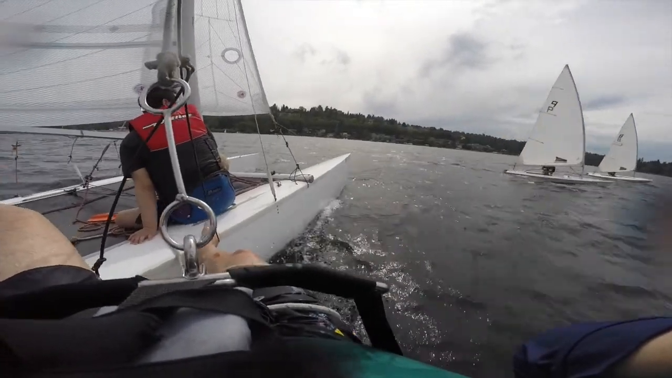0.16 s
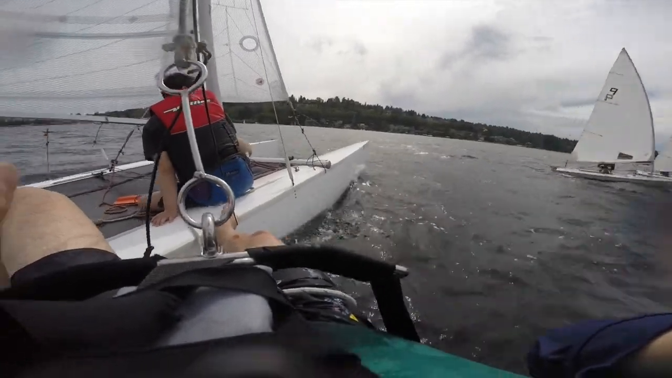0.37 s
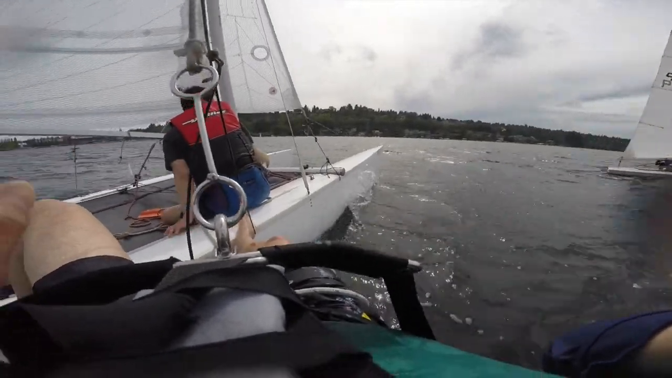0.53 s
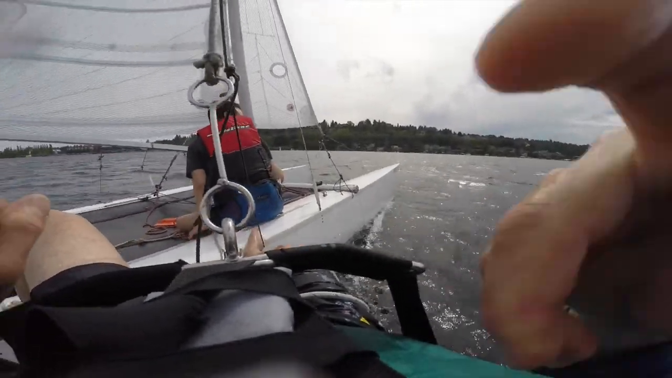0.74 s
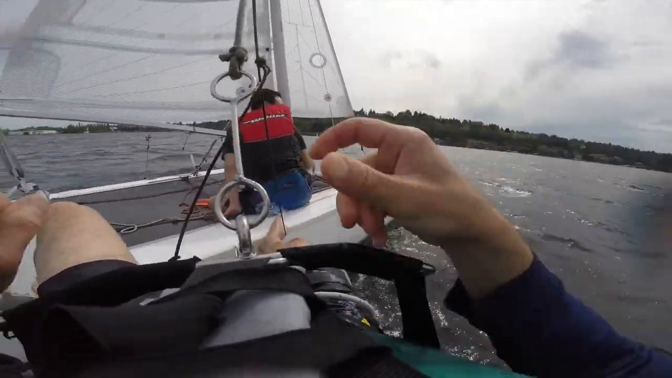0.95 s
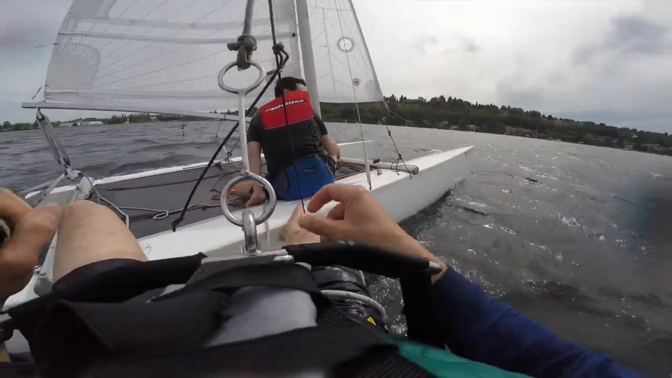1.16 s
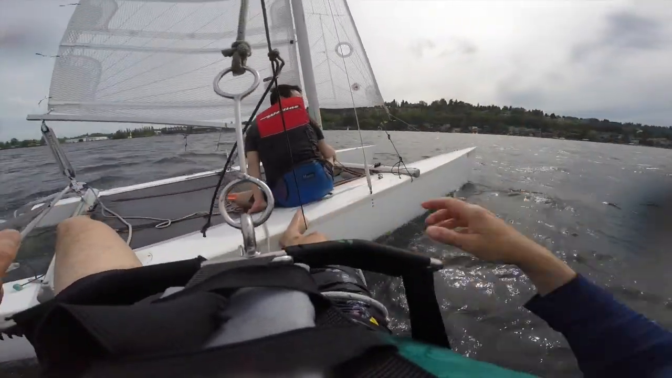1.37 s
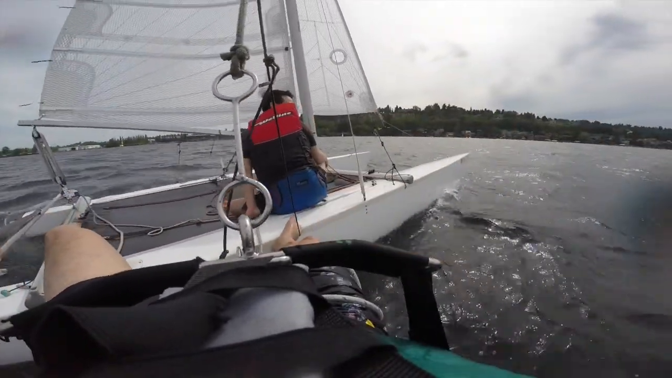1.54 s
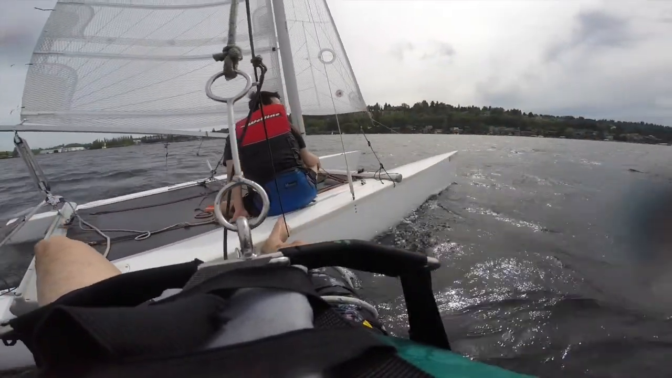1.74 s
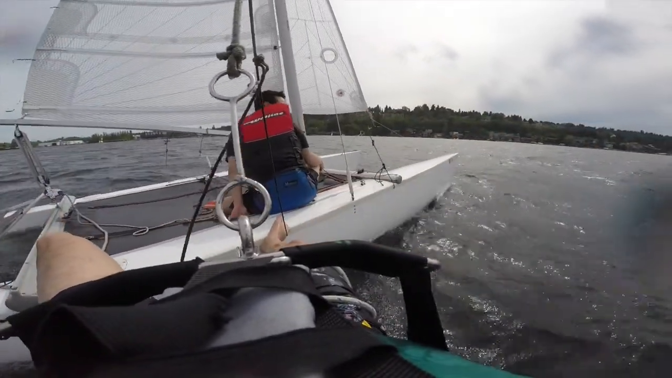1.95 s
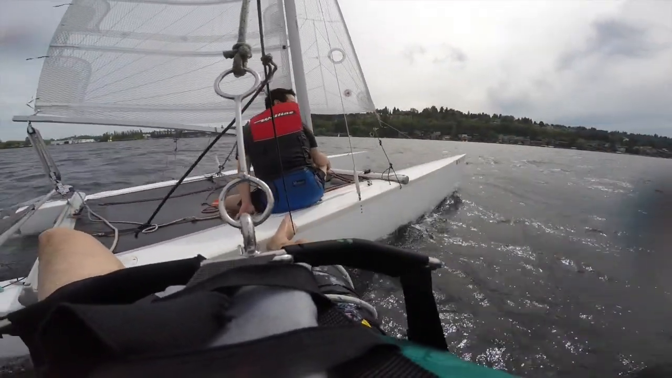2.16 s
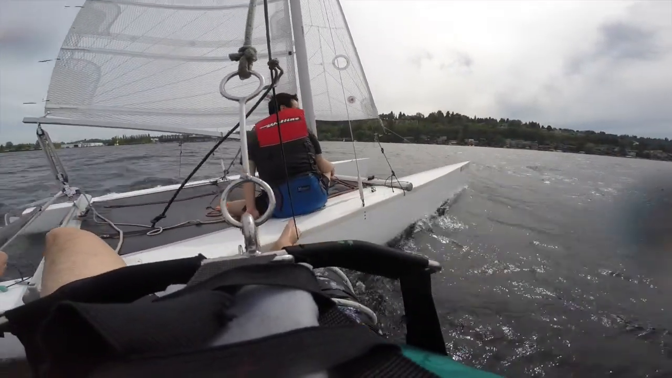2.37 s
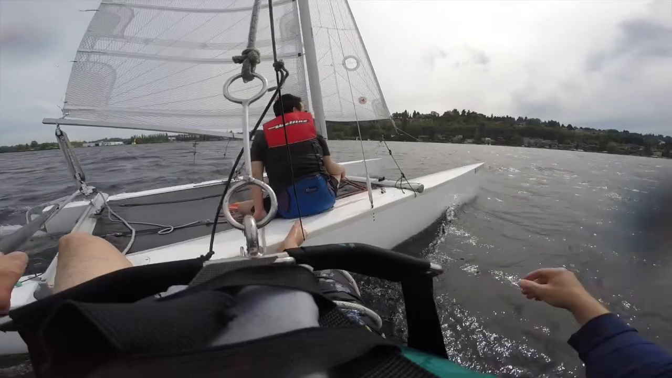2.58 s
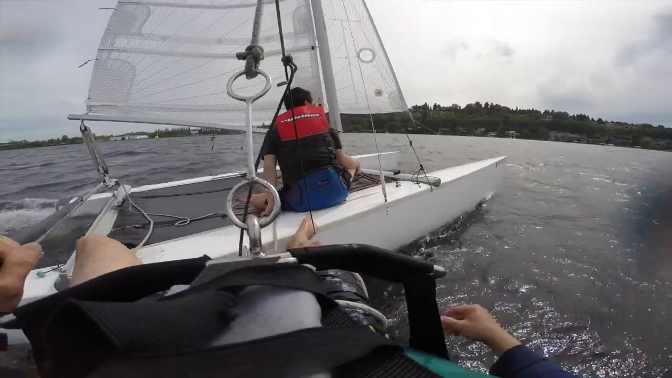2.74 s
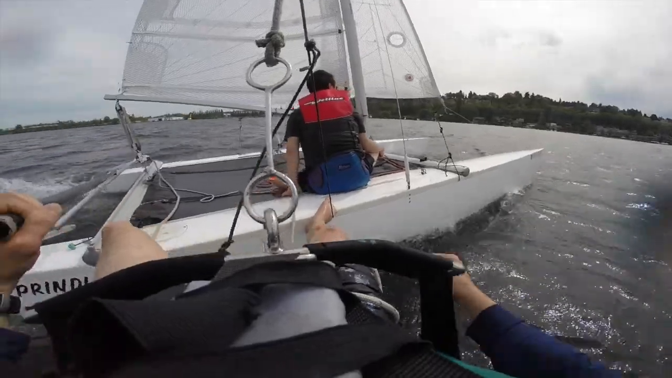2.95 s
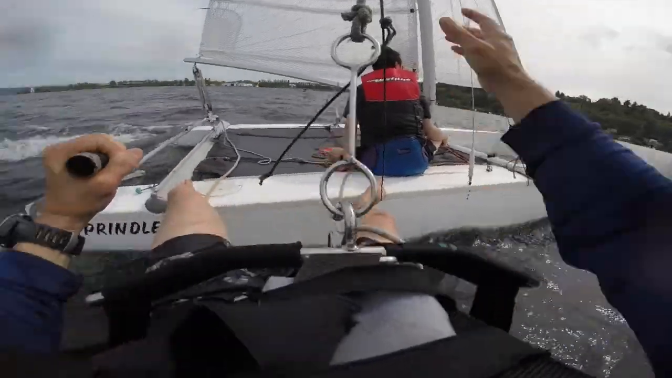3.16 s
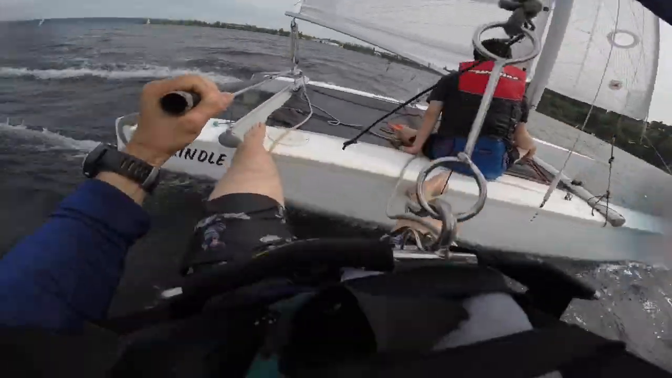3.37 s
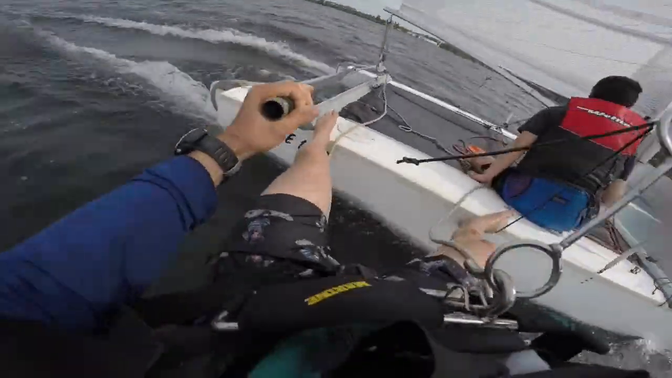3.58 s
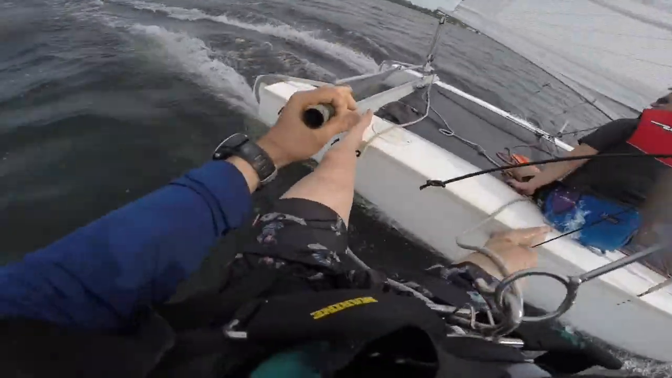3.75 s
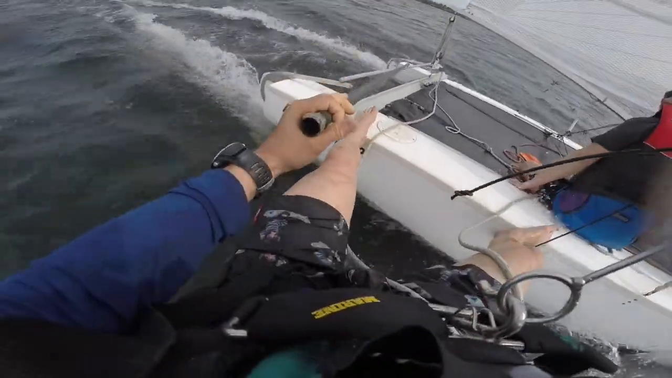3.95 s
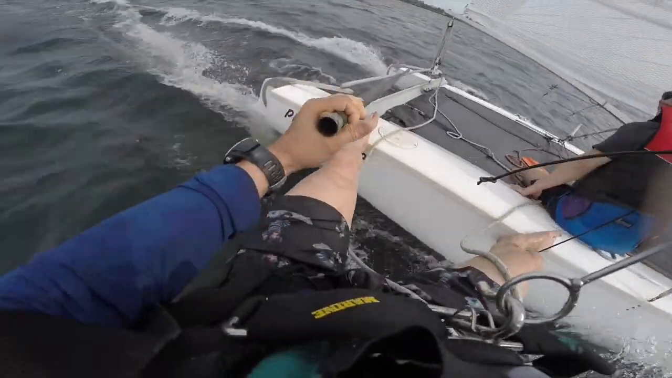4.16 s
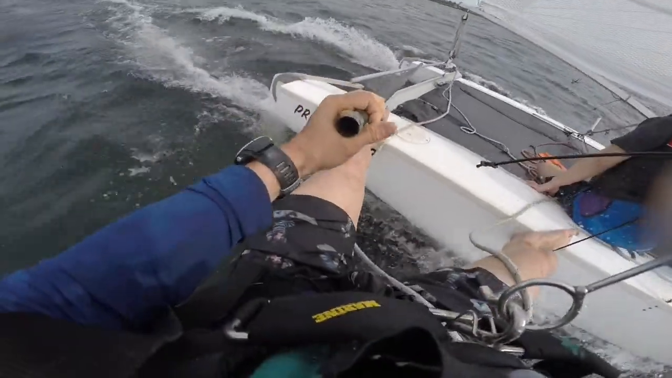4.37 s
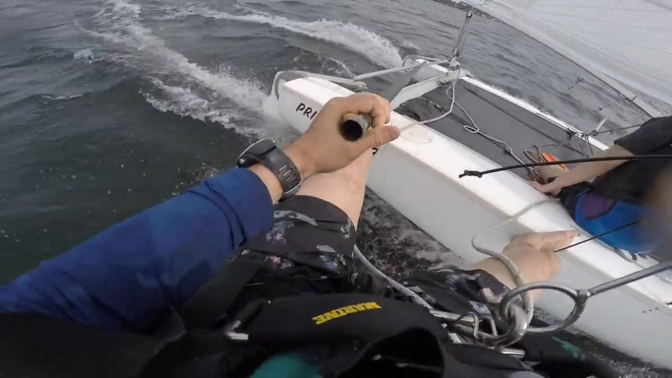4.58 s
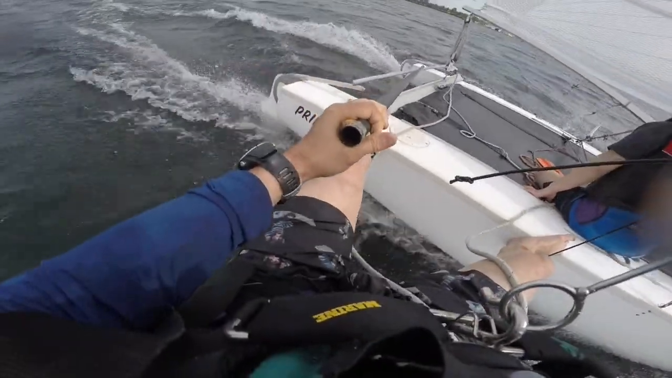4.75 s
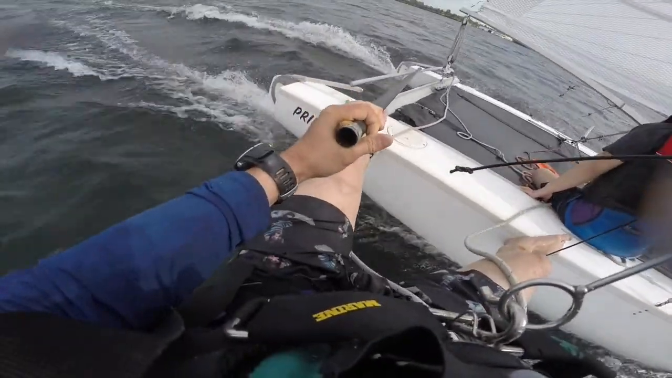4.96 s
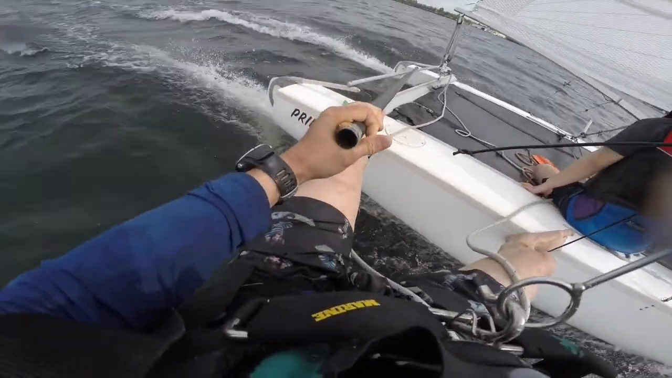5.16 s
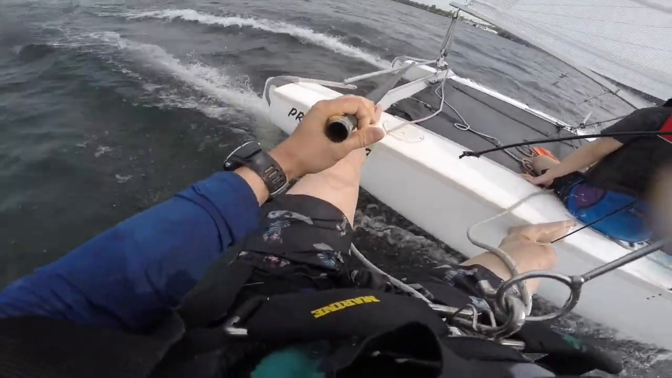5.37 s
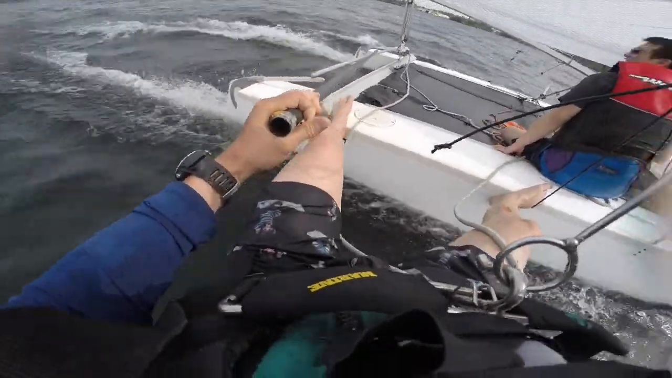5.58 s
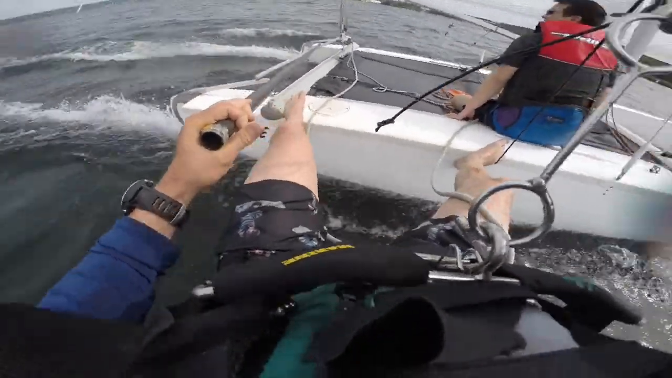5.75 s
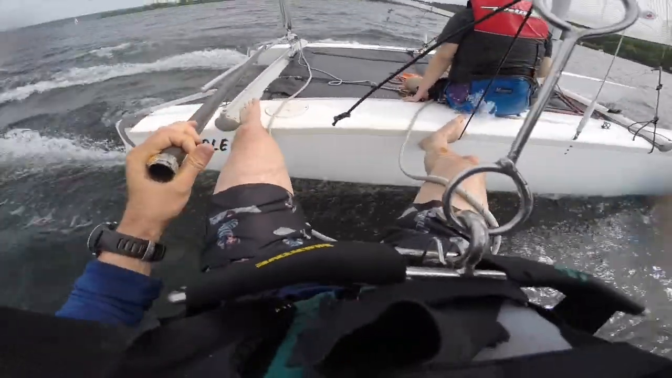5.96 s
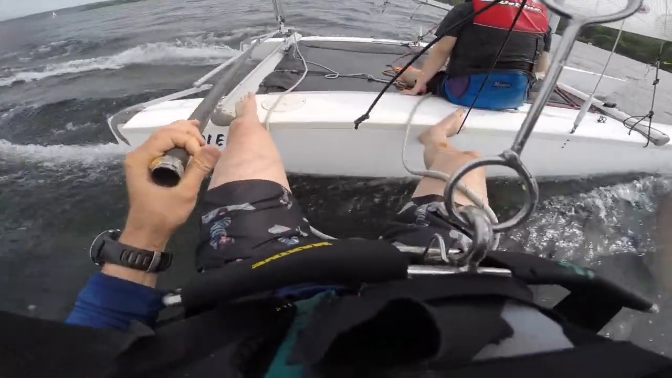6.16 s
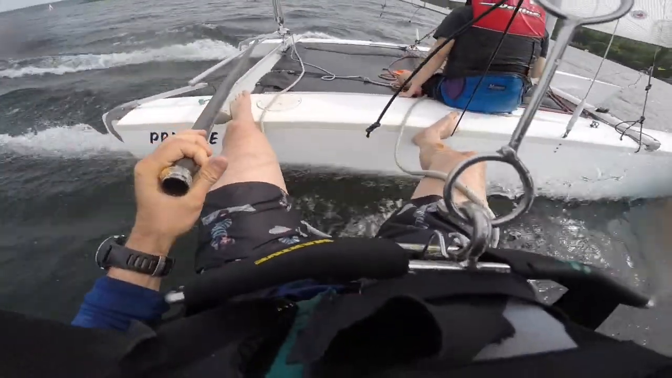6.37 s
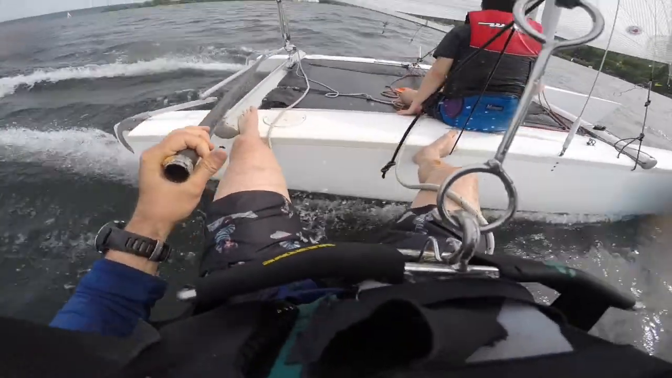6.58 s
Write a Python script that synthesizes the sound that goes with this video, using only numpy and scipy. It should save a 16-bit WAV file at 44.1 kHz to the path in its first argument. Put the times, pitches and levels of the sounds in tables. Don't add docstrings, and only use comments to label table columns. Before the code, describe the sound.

On open water beside a fast catamaran, wash hisses and fizzes continuously a few metres away. Heard through a sealed plastic case, it sounds muffled and resonant. A very loud crack and a flurry of clicks and scrapes hit the case early. Midway, wind thumps and rips across it as the head turns, and the wash changes colour. Later come a few light taps and a sharp flick.

```python
import sys
import numpy as np
from scipy import signal
from scipy.fft import rfft, irfft
from scipy.io import wavfile
from scipy.ndimage import uniform_filter1d

SR = 44100
rng = np.random.default_rng(int(sys.argv[2]) if len(sys.argv) > 2 else 0)


def unload_wav(signal):
    wavfile.write(
        sys.argv[1],
        SR,
        np.round(np.clip(np.atleast_2d(signal).T, -1, 1) * 32767).astype(np.int16),
    )


def to_linear_factor(level_db):
    exponent = np.asarray(level_db, float) / 20
    return 10 ** exponent


N = 291930

# (time [s], level [dB])
WASH_FLOW = [(0.0, -39.5), (0.26, -41.5), (0.48, -47.5), (0.68, -45.5), (0.92, -41), (1.75, -44),
             (2.91, -42), (3.43, -36.5), (4.13, -44), (4.35, -40.5), (4.55, -41), (5.49, -42),
             (6.01, -40.5), (6.38, -44.5), (6.62, -40.5)]
# (time [s], turn [0 bow - 1 wake])
HEAD_TURN = [
    (0, 0.22),
    (2.9, 0.36),
    (3.4, 0.3),
    (3.8, 0.91),
    (5.9, 0.87),
    (6.62, 0.47),
]
# (frequency [Hz], level [dB per Hz])
BOW_COLOUR = [(290, -36), (500, -13.5), (718, -13), (1320, -5), (1640, -3), (2160, -7.5), (2390, -6.5),
              (3250, -17.5), (3540, -15.5), (3920, -22.5), (5550, -15.5), (8090, -34.5), (10400, -34),
              (14500, -39), (16000, -69)]
# (frequency [Hz], level [dB per Hz])
WAKE_COLOUR = [(290, -49), (500, -10.5), (570, -12), (621, -11.5), (1020, -13), (1360, -3), (1770, -9),
               (1950, -8.5), (2650, -8), (3060, -16), (5800, -17), (8210, -39), (12500, -39), (14900, -48),
               (16000, -86)]
# (frequency [Hz], width [Hz], lift [dB])
BOW_MODES = [(1630, 390, 2), (2360, 190, 9.5), (2900, 640, -4), (4100, 150, 4), (4940, 160, -8),
             (5400, 950, -1.5), (9600, 640, 2), (10450, 800, 6.5), (11300, 470, -8)]
# (frequency [Hz], width [Hz], lift [dB])
WAKE_MODES = [(1400, 100, 0), (1755, 175, 5.5), (2120, 74, -2), (2315, 27, 8.5), (2567, 72, -7),
              (2645, 350, 12), (2955, 190, -8), (3620, 300, -13), (5050, 220, -3.5), (8750, 400, 1),
              (12200, 340, -2), (12600, 880, 3)]
# (level facing bow [dB], lift facing wake [dB], slope [dB per dB of wash])
WASH_LAYERS = [(-44.5, -0.83, 0.9), (-56.5, 5, 0.55), (-70, 8, 0.04)]
# (start [s], lift [dB], rise [ms])
SHOWERS = [
    (.05, 3.5, 140),
    (1.85, 2.5, 150),
    (2.85, 3, 72),
    (3.8, 0, 67),
    (4.4, 4, 220),
    (6.5, 6, 120),
]
SHOWER_SHARES = [0.074, 0.96, 1.05]
# (time [s], peak [dB], rise [ms], tilt [dB per octave], ring [Hz])
TAPS = [(.4799, -14, 0.24, -5, 1200), (.6108, -18, 0.82, -14, 1400), (.6802, -18, 0.28, -14, 2000),
        (.7045, -15.5, 3.4, 3, 1950), (.7462, -30.5, 0.29, 9, 1690), (.893, -20.5, 3.7, 10, 2900),
        (.898, -14.5, 6, 7, 1650), (.904, -15.5, 3, 5, 2700), (1.797, -30, 19, -9, 2600),
        (2.11, -29.5, 38, -15, 1700), (3.28, -21.5, 14, -1.5, 1350), (3.564, -24, 3, -5, 2500),
        (3.581, -24, 16, -15, 3170), (3.7478, -19.5, 1.05, 6, 8300), (3.806, -30, .4, 7.5, 2650),
        (3.913, -24, 1.24, -5, 1490), (4.4255, -17.5, 1.4, -17, 2530), (5.785, -14.5, 0.38, 0.5, 2450),
        (5.8071, -20, 0.27, -7, 2480), (3.288, -24, 0.64, 3, 5500), (3.3005, -29, .5, 8, 1200)]
# (frequency [Hz], level [dB])
CASE_COLOUR = [(300, -24), (800, -5), (1300, 8), (1700, 4.5), (2500, 8.5), (3500, -1.5), (4500, -8),
               (6000, -13.5), (8000, -24), (10500, -30), (13000, -31), (15000, -48), (16500, -71)]
# (frequency [Hz], level [dB], ring time to -60 dB [ms])
LENS = [(875, -1, -1.5), (1660, -6, 14), (1940, -6.5, 9), (2200, -1, 10), (3300, -4, 3.5),
        (4340, -19.5, 10)]
DOOR = [(1480, -12, 18), (1710, -1.5, 15), (2360, 2.5, 9.7), (3390, -7, 11), (4270, -22, 6)]
LATCH = [(1605, -1.5, 18), (2580, 1.5, 11), (3650, -3, 9.4), (5150, -6.5, 11), (7200, -12, 7)]
CLASP = [(1720, -1, 15), (2000, -8, 9), (2700, -7, 31), (4100, -3, 9.9), (5760, -9, 9.9)]
DROP = [(3930, -1.5, 10), (4470, -11, 10)]
SHELL = [(990, 2, 14), (1350, 0, 16)]
BUCKLE = [(2540, 0.5, 23), (3260, -8, 22)]
STRAP = [(770, -12.5, 23), (1330, -10, 11), (2140, -20, 29), (2345, -9.5, 17), (2564, 2, 18.5),
         (3330, -20, 8.4), (4360, -15.5, 12)]
# (part's modes, contact [ms], list of (time [s], strength [dB], pitch [re its modes]))
STRIKES = [
    (LENS, .45, [(.48, -7.5, 0.98)]),
    (DOOR, 0.66, [(.611, -10.5, 1.013)]),
    (CLASP, 0.22, [(.6803, -13.5, 1.01), (.7464, -28, 1.02)]),
    (LATCH, .28, [(.7088, -11, 1.033)]),
    (BUCKLE, 0.45, [(3.748, -25.5, 1.04), (3.8068, -37, 1.23), (3.914, -34, 1.02), (4.426, -22, 0.94)]),
    (STRAP, 0.26, [(5.7853, -10.5, 0.95), (5.7888, -20, 0.89), (5.8072, -23, 0.92)]),
    (DROP, 0.77, [(.805, -36, 1.1), (2.061, -32.5, 1.38), (4.5935, -32, .99)]),
    (SHELL, 1.7, [(3.298, -23, 1.25)]),
]
# (time [s], peak [dB], swing [Hz], decay [ms], direction [+-1])
KNOCKS = [
    (0.4798, -3.5, 88, 1.35, 1),
    (0.61, -21.5, 287, 4, 1),
    (.68, -24.5, 200, 1.3, 1),
    (.708, -19, 111, 14.4, 1),
    (.748, -29.5, 624, 4.2, 1),
    (4.426, -23, 280, 4.3, -1),
    (4.635, -32.5, 330, 3.3, -1),
    (5.785, -26, 510, 3.6, 1),
    (5.806, -19.5, 110, 4.1, 1),
]
# (time [s], peak [dB], swing [Hz], decay [ms], direction [+-1])
SLAPS = [(0.89, -19.5, 65, 9.6, 1), (1.7, -25.5, 147, 21.8, 1), (1.79, -25.5, 172, 20, 1),
         (3.74, -29.5, 220, 11.6, 1), (2.4, -24, 133, 11.8, 1), (3.27, -22, 302, 16, 1),
         (3.291, -18, 302, 6.65, 1), (3.3, -7, 130, 4.5, 1), (3.346, -18.5, 100, 6.4, -1),
         (3.44, -22, 161, 15.6, 1), (3.489, -19, 138, 8, 1), (3.568, -14, 121, 8.7, 1),
         (3.586, -11.5, 105, 8.6, -1), (4.71, -39, 383, 6.7, 1), (5.527, -23.5, 143, 4.1, 1),
         (5.533, -22.5, 200, 5.6, 1), (5.932, -24, 112, 11, 1), (5.999, -33, 340, 6.8, 1),
         (6.218, -28, 256, 4, 1), (6.5, -24.5, 49.3, 14.4, 1)]
# (time [s], strength [dB])
GUSTS = [(0.0, -38.5), (0.24, -38.5), (0.59, -42), (0.96, -36.5), (1.27, -40), (1.53, -40.5), (1.86, -37),
         (2.12, -37), (3.08, -38), (3.3, -32.5), (3.45, -30), (4.09, -43.5), (4.48, -44), (4.85, -48),
         (5.49, -45), (5.79, -36), (6.32, -43), (6.62, -40)]
# (frequency [Hz], level [dB per Hz])
EDDY_COLOUR = [(11, -36), (18, -12), (32, 10), (66, 1), (118, 0), (172, -5), (206, -11), (259, -13),
               (301, -9), (372, -17.5), (424, -18.5), (649, -28.5), (900, -29), (1170, -47), (1980, -120)]
# (level in a mean gust [dB], slope [dB per dB of gust])
WIND_LAYERS = [(-42.5, 0.75), (-42.5, 1.18), (-48, 0.97)]
# (start [s], peak [dB], rise [ms])
TEARS = [
    (3.15, -46.5, 96),
    (3.245, -33, 37),
    (3.33, -41, 70),
    (3.41, -39, 35),
    (3.46, -41, 36),
    (3.565, -32.5, 32),
    (3.7, -41.5, 130),
]
# (frequency [Hz], level [dB per Hz])
TEAR_COLOUR = [(180, -24), (300, 4), (675, -22), (1130, -3), (1460, -23), (2360, -7), (4290, -19),
               (4810, -38), (6580, -42), (9000, -47), (11700, -77), (19800, -120)]
# (time [s], pitch [Hz], level [dB])
WIRE_TONE = [(1.28, 1310, -67), (1.36, 1290, -57), (1.44, 1235, -53), (1.52, 1170, -53), (1.58, 1130, -60),
             (1.66, 1125, -56), (1.73, 1110, -59), (1.85, 1100, -72)]


def wash():
    (turn,), (flow,) = curves(HEAD_TURN), curves(WASH_FLOW)
    turn = np.clip(turn, 0, 1)
    source = fizz(per_s=2500, spread_db=2.5, share=0.38, burst_ms=1.03)
    from_bow = unit(colour(source, BOW_COLOUR, BOW_MODES))
    from_wake = unit(colour(source, WAKE_COLOUR, WAKE_MODES))
    heard = (1 - turn) * from_bow + turn * from_wake
    slosh = 1.22 * walk(11) + 0.1 * walk(38)
    shower = shower_lift()
    bands = split(heard, [450, 3200, 7600, 17000])
    slosh_shares = [1.1, .6, .5]
    mean_flow_db = -44
    out = np.zeros(N)
    for part, (db, lift, slope), shower_share, slosh_share in zip(bands, WASH_LAYERS, SHOWER_SHARES, slosh_shares):
        level = db + lift * turn + slope * (flow - mean_flow_db) + shower_share * shower
        flicker = slosh_share * slosh + 0.73 * walk(24)
        out += part * to_linear_factor(level + flicker)
    return out


def fizz(per_s, spread_db, share, burst_ms):
    starts = (rng.random(N) < per_s / SR) * to_linear_factor(spread_db * rng.exponential(size=N))
    fade = np.exp(-1000 / (burst_ms * SR))
    bursts = signal.lfilter([1], [1, -fade], starts) * rng.standard_normal(N)
    return np.sqrt(share) * unit(bursts) + np.sqrt(1 - share) * rng.standard_normal(N)


def shower_lift():
    t = np.arange(N) / SR
    return sum(db * swell(np.maximum(t - s, 0), rise, 0.62 * rise) for s, db, rise in SHOWERS)


def taps():
    return scrapes() + snap() + rings()


def scrapes():
    out, t = np.zeros(N), np.arange(4096) / SR
    for s, db, rise, tilt, hz in TAPS:
        full_touch = np.arange(len(t)) == int(rise / 1000 * SR)
        crack = 3.9 / max(rise, 1) * full_touch
        grit = rng.standard_normal(len(t)) * swell(t, rise, 1.5 + 0.57 * rise)
        tilted = [(f, d + tilt * max(np.log2(f / 2800), 0)) for f, d in CASE_COLOUR]
        add(out, s, colour(crack + grit, tilted, [(hz, 300, 5)]), db)
    return out


def snap():
    out = np.zeros(N)
    tilt_db = 0.5
    tilted = [(f, d + tilt_db * np.log2(f / 2800)) for f, d in CASE_COLOUR]
    add(out, .4805, response(tilted, [(900, 1300, 10)]), -12)
    return out


def rings():
    out, t = np.zeros(N), np.arange(4096) / SR
    for modes, contact_ms, strikes in STRIKES:
        for s, strength_db, pitch in strikes:
            for hz, db, ring_ms in modes:
                envelope = swell(t, contact_ms, ring_ms / np.log(1000))
                add(out, s, envelope * np.sin(2 * np.pi * hz * pitch * t), db + strength_db)
    return out


def thumps():
    out, t = np.zeros(N), np.arange(8192) / SR
    vent = signal.butter(1, 45, "high", fs=SR)
    pushes = [(0.85, *knock) for knock in KNOCKS]
    pushes += [(0.627 * slap[3], *slap) for slap in SLAPS]
    for rise, s, db, hz, decay, direction in pushes:
        swing = np.cos(2 * np.pi * hz * (t - rise / 1000))
        push = np.sign(direction) * swell(t, rise, decay) * swing
        add(out, s, signal.lfilter(*vent, push), db)
    return out


def wind():
    puffs, (gust,) = walk(12), curves(GUSTS)
    eddies = colour(rng.standard_normal(N), EDDY_COLOUR, size=16384)
    bands = split(eddies, [12, 80, 220, 1000])
    shared_db, own_db = [1.2, 1.5, 1.6], [.6, 1.3, 2.1]
    mean_gust_db = -41
    out = np.zeros(N)
    for part, (db, slope), shared, own in zip(bands, WIND_LAYERS, shared_db, own_db):
        level = db + slope * (gust - mean_gust_db)
        out += part * to_linear_factor(level + shared * puffs + own * walk(30))
    return out


def seam_tear():
    rips, t = np.zeros(N), np.arange(SR) / SR
    for s, db, rise in TEARS:
        add(rips, s, swell(t, rise, 1.2 * rise), db)
    ragged = fizz(per_s=450, spread_db=3.5, share=.6, burst_ms=1.5)
    return unit(colour(ragged, TEAR_COLOUR)) * rips * to_linear_factor(1.5 * walk(90))


def wire():
    hz, db = curves(WIRE_TONE)
    level = to_linear_factor(db + 2.5 * walk(30))
    wavering_hz = hz * (1 + .025 * walk(45))
    return level * np.sqrt(2) * np.sin(2 * np.pi * np.cumsum(wavering_hz) / SR)


def curves(table):
    s, *columns = np.array(table).T
    return [np.interp(np.arange(N) / SR, s, c) for c in columns]


def unit(x):
    return x / np.sqrt(np.mean(x ** 2))


def walk(rate):
    k = int(SR / rate)
    held = np.repeat(rng.standard_normal(N // k + 1), k)
    return 1.24 * uniform_filter1d(uniform_filter1d(held, k), k)[:N]


def swell(t, rise_ms, decay_ms):
    rise, decay = max(rise_ms, .05) / 1000, max(decay_ms, .2) / 1000
    attack = np.sin(np.pi / 2 * np.minimum(t / rise, 1)) ** 2
    return attack * np.exp(-np.maximum(t - rise, 0) / decay)


def add(out, s, sound, peak_db):
    i = int(s * SR)
    scaled = sound * to_linear_factor(peak_db) / np.abs(sound).max()
    out[i:i + len(sound)] += scaled[:N - i]


def response(points, modes=(), size=2048):
    hz = np.maximum(np.arange(size // 2 + 1) * SR / size, 1)
    point_hz, point_db = np.array(points).T
    db = np.interp(np.log(hz), np.log(point_hz), point_db)
    for centre, width, lift in modes:
        db = db + lift / (1 + (2 * (hz - centre) / width) ** 2)
    cepstrum = irfft(db * np.log(10) / 20)
    cepstrum[1:size // 2] *= 2
    cepstrum[size // 2 + 1:] = 0
    return irfft(np.exp(rfft(cepstrum)))


def colour(x, points, modes=(), size=2048):
    return signal.fftconvolve(x, response(points, modes, size))[:len(x)]


def band(x, lo_hz, hi_hz):
    sos = signal.butter(4, [lo_hz, min(hi_hz, .45 * SR)], "band", fs=SR, output="sos")
    return signal.sosfilt(sos, x)


def split(x, edges_hz):
    parts = [band(x, lo, hi) for lo, hi in zip(edges_hz, edges_hz[1:])]
    return [p / np.sqrt(uniform_filter1d(p ** 2, SR // 2) + 1e-18) for p in parts]


def scene():
    gate = signal.ellip(14, .3, 60, 15290, fs=SR, output="sos")
    steady = wash() + wind() + seam_tear() + wire()
    touches = taps() + thumps()
    return (signal.sosfilt(gate, steady) + touches)[None]


def low_pass(x):
    return signal.sosfilt(signal.butter(12, 16490, fs=SR, output="sos"), x)


def record(dry):
    mix = np.clip(dry, -1, 1)
    return low_pass(mix)


dry = scene()
out = record(dry)
unload_wav(out)
```